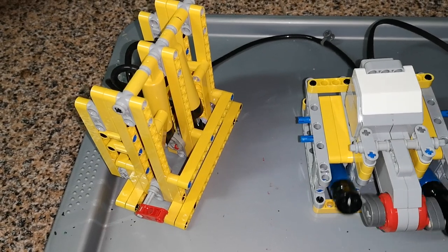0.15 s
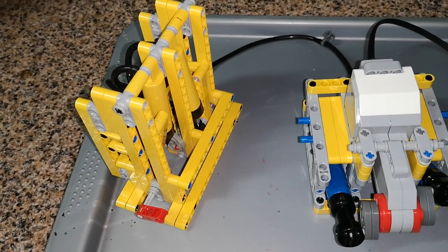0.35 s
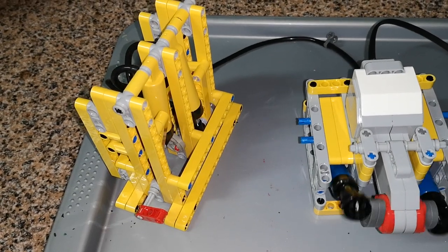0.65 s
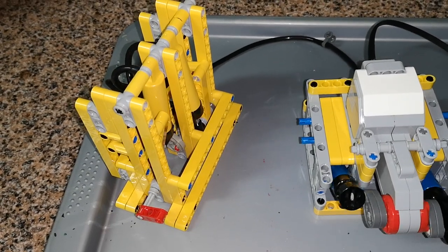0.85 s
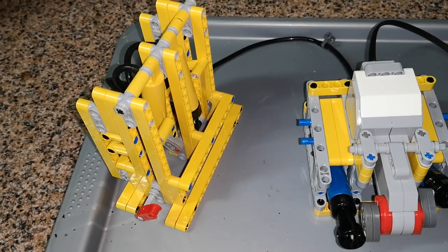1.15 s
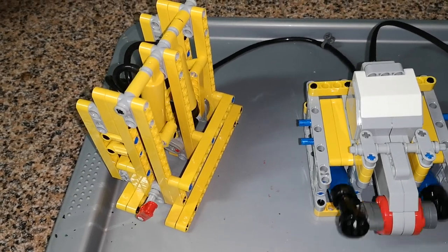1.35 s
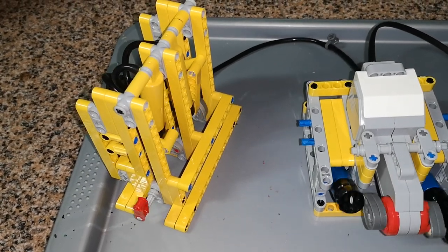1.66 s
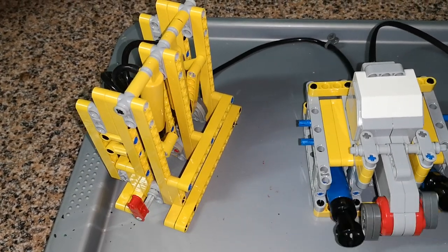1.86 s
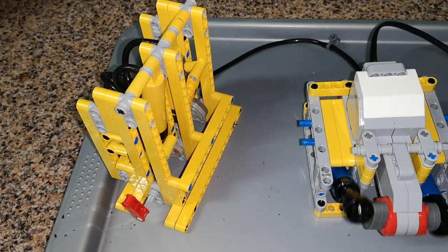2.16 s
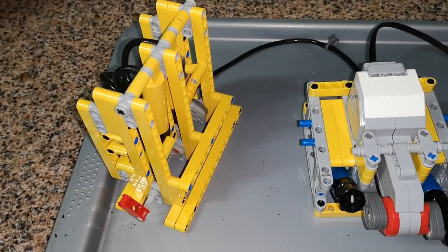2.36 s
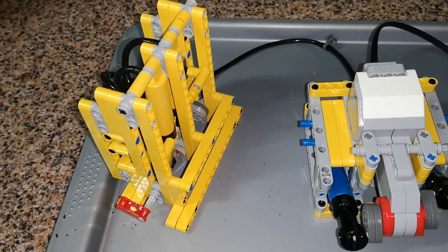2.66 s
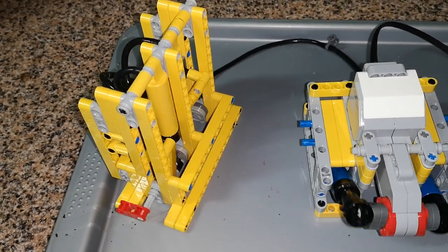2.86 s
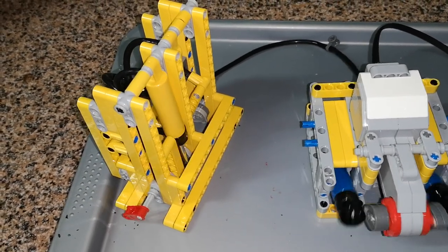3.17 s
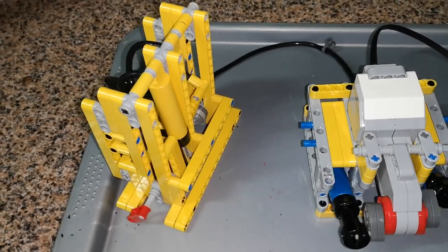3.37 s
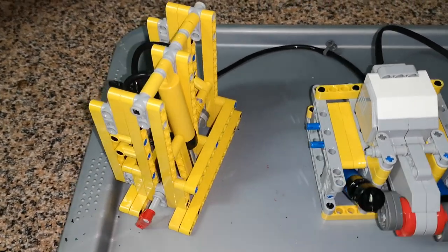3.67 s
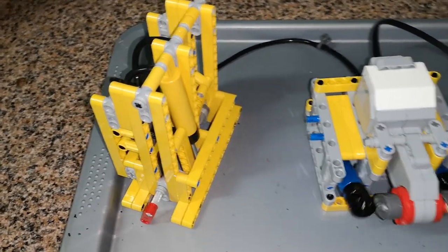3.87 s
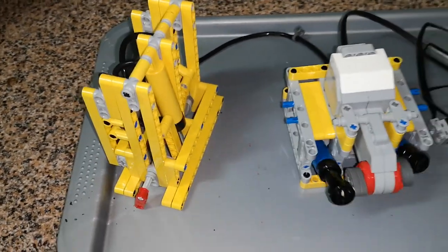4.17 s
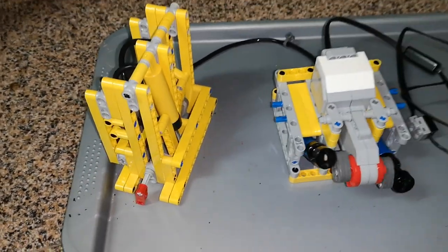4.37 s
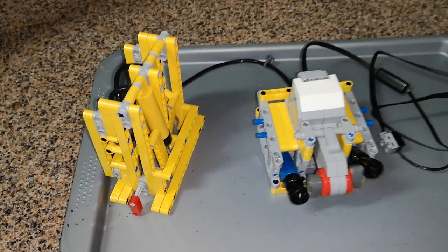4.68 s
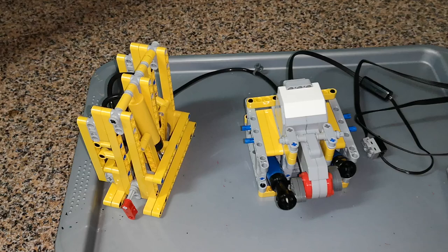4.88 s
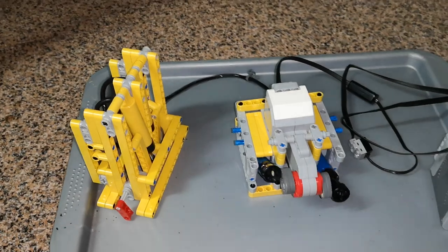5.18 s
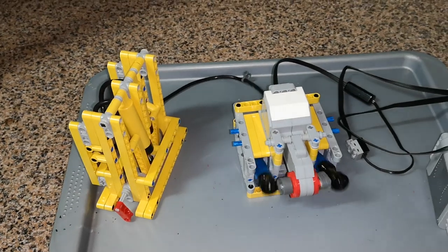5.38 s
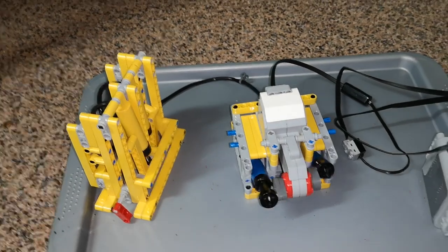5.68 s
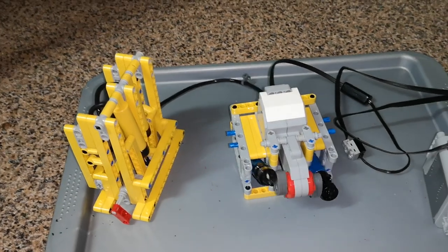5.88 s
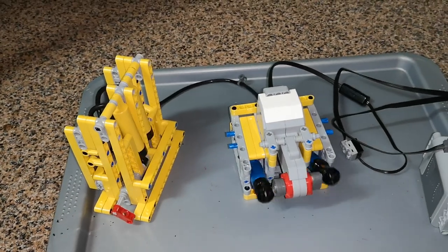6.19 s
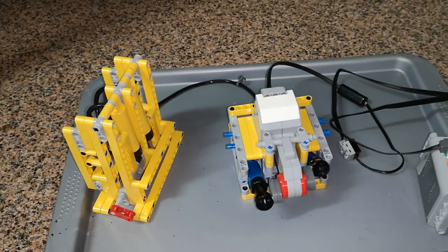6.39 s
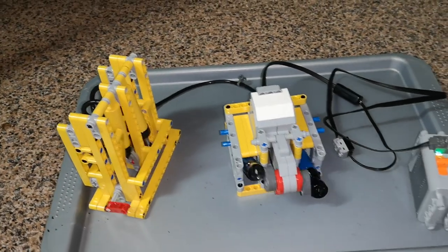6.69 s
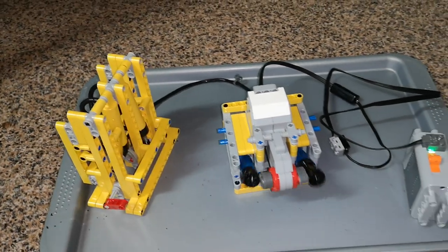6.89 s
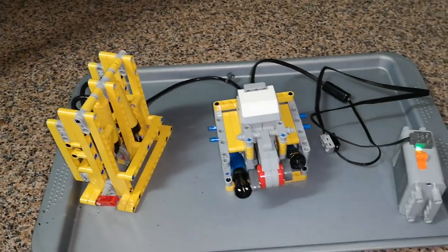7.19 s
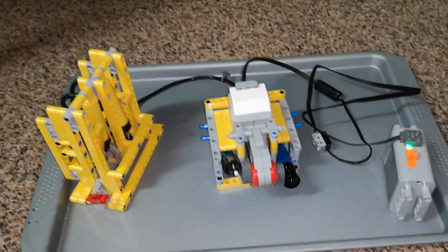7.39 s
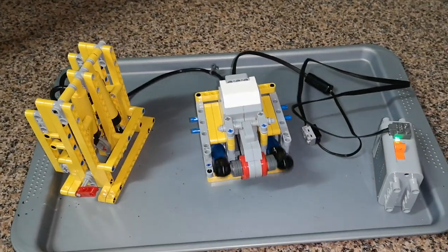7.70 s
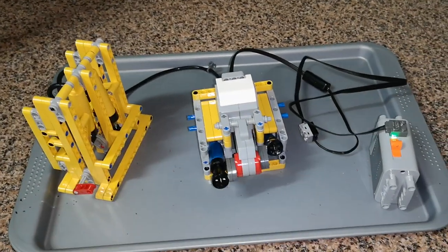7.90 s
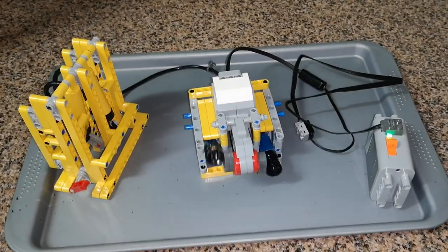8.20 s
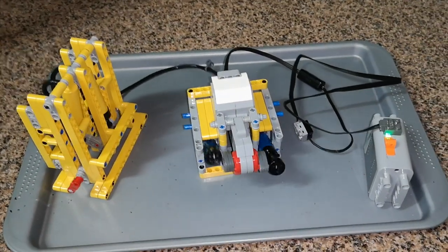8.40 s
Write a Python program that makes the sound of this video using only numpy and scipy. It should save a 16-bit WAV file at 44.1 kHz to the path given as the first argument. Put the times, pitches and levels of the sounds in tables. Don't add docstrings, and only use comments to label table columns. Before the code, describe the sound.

A little motor cranks two toy air pumps without pause, its buzzy whine swooping down and back up about every 0.38 seconds. Each upswing brings a clack, a tick and a chatter of loose gears, with the tray humming and shuddering low. Faint steady hiss of leaking air, uneven hand rumble, a short room tail. The hand-held phone swings round midway, with one dull thump, and the pumps end a little further off.

```python
import sys
import numpy as np
from scipy import signal
from scipy.fft import rfft, irfft, next_fast_len
from scipy.io import wavfile
from scipy.ndimage import uniform_filter1d

SR = 44100
rng = np.random.default_rng(int(sys.argv[2]) if len(sys.argv) > 2 else 0)


def invert_db(level):
    return 10 ** (np.asarray(level, dtype=float) / 20)


def file_out(sig):
    cols = np.atleast_2d(sig).T
    lim = np.clip(cols, -1, 1)
    pcm = np.round(lim * 32767).astype(np.int16)
    wavfile.write(sys.argv[1], SR, pcm)


N = 376613
SIZE = next_fast_len(N + SR)
HZ = np.arange(SIZE // 2 + 1) * SR / SIZE
TIME = np.arange(N) / SR


def unit(x):
    return x / np.sqrt(np.mean(x ** 2))


def curves(table, at=TIME):
    s, *columns = np.transpose(table)
    return [np.interp(at, s, c) for c in columns]


def on_log_hz(points):
    hz, value = np.transpose(points)
    return np.interp(np.log(HZ + 1), np.log(hz + 1), value)


def filtered(x, response):
    return irfft(rfft(x, SIZE) * response, SIZE)[..., :N]


def band(lo_hz, hi_hz, order=4):
    sos = signal.butter(order, [lo_hz, hi_hz], "band", fs=SR, output="sos")
    return signal.sosfreqz(sos, HZ, fs=SR)[1]


def walk(rate):
    k = int(SR / rate)
    held = np.repeat(rng.standard_normal(N // k + 1), k)
    return unit(uniform_filter1d(uniform_filter1d(held, k), k)[:N])


def decays(s, db, decay_s):
    hits = np.zeros(N)
    hits[(np.asarray(s) * SR).astype(int)] = invert_db(db)
    return signal.lfilter([1], [1, -np.exp(-1 / (decay_s * SR))], hits)


# (f/Hz, level/dB [dB per Hz])
HAND_COLOUR = [(8, -36), (16, 6), (24, -2.5), (30, -6.5), (38, -11), (45, -20), (75, -8.5), (130, -35),
               (200, -20), (360, -32.5), (700, -33), (1200, -69)]
# (t/s, level/dB)
GRIP_LEVEL = [(0.0, -60.5), (0.78, -39.5), (0.9, -51), (2.21, -44), (2.4, -52.5), (3.99, -43.5),
              (4.23, -54.5), (4.71, -43.5), (5.07, -55.5), (5.49, -40), (5.59, -57), (5.76, -41),
              (5.99, -55.5), (7.02, -41), (7.11, -59), (7.25, -46.5), (8.52, -45), (8.54, -51)]
# (t/s, level/dB)
TREMBLE = [
    (0, -72.5),
    (1.9, -76),
    (2.0, -101),
    (2.12, -95),
    (2.2, -76),
    (4.3, -74),
    (8.54, -73),
]


def hand_rumble():
    colour = invert_db(on_log_hz(HAND_COLOUR))
    deep = np.clip((70 - HZ) / 25, 0, 1)
    above = 1 - deep
    mid, side = rng.standard_normal((2, N))
    rumble = filtered(mid, colour * deep)
    difference = filtered(side, colour * np.clip(HZ / 500, 0, 1) * above)
    floor = filtered(mid, colour * above) + np.outer([1, -1], difference)
    low = filtered(floor, np.clip((330 - HZ) / 80, 0, 1) * above)
    tremble_db, = curves(TREMBLE)
    floor = floor + low * (invert_db(tremble_db - np.median(tremble_db)) - 1)
    unrest = invert_db(2.0 * walk(2.657) + 1.9 * walk(10))
    grip_db, = curves(GRIP_LEVEL)
    return (invert_db(grip_db) * rumble + invert_db(-58.5) * floor * unrest) / np.std(rumble)


# (t/s, share 0 pumps to the right - 1 ahead)
SWING = [
    (0, 0.08),
    (3.2, 0.05),
    (4.3, 0.64),
    (5.2, 0.93),
    (8.6, 0.96),
]
AIR_DB, AIR_FADE_DB = -61.5, -2.0


def air_leak():
    hiss = filtered(rng.standard_normal((2, N)), band(7300, 15400, order=2))
    swing, = curves(SWING)
    return invert_db(AIR_DB + AIR_FADE_DB * swing) * unit(hiss)


# (t/s, peak level/dB)
JOLTS = [(0.294, -46.5), (0.588, -56), (0.694, -43), (1.09, -47), (1.24, -47), (1.471, -51), (1.848, -45),
         (2.225, -55), (2.567, -49), (2.932, -52), (3.284, -62), (3.583, -53), (3.788, -61), (3.973, -52),
         (4.35, -60), (4.713, -55), (5.103, -50), (5.484, -47), (5.778, -48), (5.897, -47), (6.267, -47),
         (6.643, -55), (7.01, -46.5), (7.409, -45), (7.793, -49.5), (8.224, -45.5), (8.343, -48)]
JOLT_RISE_S, JOLT_DECAY_S, JOLT_DB = 0.036, 0.027, -1.5
BUMP_SHAKE_DB, BUMP_SHAKE_S = -35.5, 0.071


def tray_shudder():
    mid, side = rng.standard_normal((2, N))
    shudder = filtered(mid + 0.13 * np.outer([1, -1], side), band(83, 185, order=2))
    s, db = np.transpose(JOLTS)
    jolts = decays(s, db + JOLT_DB, JOLT_DECAY_S)
    jolts = jolts + decays(BUMP_CONTACTS[0][0], BUMP_SHAKE_DB, BUMP_SHAKE_S)
    tremble = invert_db(curves(TREMBLE)[0] + 3.9 * walk(6.7))
    shake = uniform_filter1d(jolts, int(JOLT_RISE_S * SR)) + tremble
    return shake * unit(shudder)


# (t/s, level/dB)
BUMP_CONTACTS = [
    (4.066, -12),
    (4.075, -18.5),
    (4.084, -7),
    (4.1, -41),
]
# (f/Hz, level/dB, t60/s)
BUMP_MODES = [(122.3, -21.5, 0.46), (149.7, -7.5, 0.06), (207, -10, 0.071), (233.6, -9.5, 0.11),
              (300, -22, 0.15)]
BUMP_LEAD_RAD = .36


def bump():
    push = np.zeros(N)
    for k, (s, db) in enumerate(BUMP_CONTACTS):
        push[int(s * SR)] = invert_db(db) * (-1) ** k
    soft_push = uniform_filter1d(uniform_filter1d(push, 90), 70)
    t = TIME[:SR]
    ring = sum(invert_db(db) * np.sin(2 * np.pi * hz * t) * 1000. ** (-t / t60) for hz, db, t60 in BUMP_MODES)
    lead = np.exp(.5j * BUMP_LEAD_RAD * np.array([[1], [-1]]))
    return filtered(soft_push, rfft(ring, SIZE) * band(117, 263, order=2) * lead)


# (t/s, peak level/dB, then low thud, clack and tick above the peak, level/dB)
KNOCKS = [(0.295, -50.5, 0, 22.5, 22), (0.698, -50, -6, 20, 18), (1.091, -52.5, 1, 27, 31),
          (1.208, -64.5, 8, 21, 29), (1.462, -56.5, -12, 21.5, 23), (1.847, -52.5, 0, 23, 15),
          (2.198, -55.5, -6, 12, 18), (2.568, -47, -1, 19, 11), (2.915, -64.5, 6, 30, 20),
          (3.269, -51.5, -1, 11, 14), (3.585, -56, 1, 6, 9), (3.919, -50.5, 4.5, -3, 6),
          (3.973, -51, -1, 16.5, 14), (4.348, -59, -3, 20, 23), (4.716, -50, -3, 14, 14),
          (5.097, -55, -4, 18, 19), (5.483, -50, -2, 21, 27), (5.889, -57.5, 2, 17, 38),
          (6.269, -51.5, -1, 24.5, 13), (6.623, -61.5, -1, 23, 35), (7.015, -45.5, -6.5, 18.5, 7),
          (7.403, -52.5, -9, 20.5, 27), (7.795, -51.5, 2.5, 21.5, 32), (8.219, -60, -4, 27, 39)]


def knocks():
    s, peak_db, thud_db, clack_db, tick_db = np.transpose(KNOCKS)
    parts = ((thud_db - 3.0, .045, band(130, 280, order=2)),
             (-4.0, .025, band(450, 970, order=2)),
             (clack_db - 5.0, .014, band(900, 2300, order=2)),
             (tick_db - 6.0, .006, band(2500, 12000, order=1)))
    out = 0
    for db, decay_s, response in parts:
        shape = uniform_filter1d(decays(s, peak_db + db, decay_s), 170)
        out = out + unit(filtered(rng.standard_normal(N), response)) * shape
    return out


# (share of the stroke 0-1, level/dB)
TOOTH_LOAD = [(0, 0.5), (.08, 0.5), (.22, 4.5), (.36, 5), (.52, 4.5), (.7, 4), (.8, 3.5), (1, -4)]
SEATING_DB = [-3, -2, -4, 1.5, -8, -2.5, 0., 4., 2, 1, -1, 3, -1.5, -1, -1.5, 0.5, 1.5, -2, -4, 1, 2.5, 4,
              -5, -2.]
WHIRR_DB, WHIRR_DB_PER_OCT = -29.5, 10.5
HISS_DB, HISS_DB_PER_OCT = -34, 13.
SLACK_WHIRR_DB, SLACK_HISS_DB = -5, -2.5
BOOM_DB, BOOM_DB_PER_OCT = -50.5, 2.5
BOOM_PEAK_DB, BOOM_WIDTH_OCT, BOOM_LAG_S = -48.5, 0.63, 0.01
RATTLE_DB, RATTLE_DECAY_S = -44, 0.057
DRAG_DB, DRAG_AT, DRAG_DECAY = 10.5, 0.267, .25
USUAL_SLOW_HZ, STALL_DB_PER_OCT, STALL_AT, STALL_WIDTH = 330, 2, 0.7, 0.076


def loudness(turn, octaves, slack, slow_hz):
    share = turn % 1
    strength_db = np.interp(turn, np.arange(len(STROKES)), np.transpose(STROKES)[3])
    stall = np.exp(-((share - STALL_AT) / STALL_WIDTH) ** 2)
    strength_db += STALL_DB_PER_OCT * np.log2(slow_hz / USUAL_SLOW_HZ) * stall

    load_db, = curves(TOOTH_LOAD, share)
    whirr_db = WHIRR_DB + WHIRR_DB_PER_OCT * octaves + load_db + SLACK_WHIRR_DB * slack
    hiss_db = HISS_DB + HISS_DB_PER_OCT * octaves + SLACK_HISS_DB * slack
    rattle = uniform_filter1d(decays(np.transpose(KNOCKS)[0], RATTLE_DB, RATTLE_DECAY_S), 300)

    since = share - DRAG_AT
    second_stroke = turn.astype(int) % 2 == 0
    drag = second_stroke * np.clip(since / 0.013, 0, 1) * np.exp(-np.maximum(since, 0) / DRAG_DECAY)
    late_octaves = np.interp(TIME - BOOM_LAG_S, TIME, octaves)
    resonance = np.exp(-(late_octaves / BOOM_WIDTH_OCT) ** 2)
    seating_db = np.array(SEATING_DB)[np.rint(turn).astype(int)]
    boom = invert_db(BOOM_DB + BOOM_DB_PER_OCT * octaves + DRAG_DB * drag)
    boom = boom + invert_db(BOOM_PEAK_DB + seating_db) * resonance
    return invert_db(strength_db) * np.array([boom, invert_db(whirr_db), invert_db(hiss_db) + rattle])


# (t/s of top speed, top tooth rate f/Hz, slowest tooth rate f/Hz, strength level/dB)
STROKES = [(-0.04, 1073, 310, 0.5), (0.348, 1090, 275, 1.5), (0.751, 1071, 280, 0.5), (1.148, 1093, 315, 1),
           (1.522, 1066, 325, .5), (1.898, 1072, 370, 1.5), (2.256, 1049, 380, .2), (2.61, 1069, 370, 0.5),
           (2.983, 1060, 440, -0.5), (3.319, 1056, 435, -0.4), (3.664, 1047, 400, -2),
           (4.019, 1073, 370, -2), (4.387, 1068, 335, 0.2), (4.761, 1083, 315, -0.4),
           (5.147, 1061, 285, -0.1), (5.539, 1088, 250, 0.9), (5.945, 1063, 320, 1),
           (6.313, 1073, 340, 0.9), (6.687, 1056, 345, -0.1), (7.062, 1072, 300, -0.2),
           (7.456, 1052, 285, -1.2), (7.853, 1089, 235, -0.7), (8.275, 1067, 330, -0.6),
           (8.68, 1076, 330, 1)]
# (share of the stroke 0-1, speed 0 slowest - 1 top, whine against whirr level/dB)
STROKE_SHAPE = [
    (0, 1.01, 1),
    (.05, 1.0, 2),
    (.21, .46, -5),
    (.34, .12, -7),
    (.5, -.02, -7),
    (.68, .12, -7),
    (.79, .43, -7),
    (.93, .97, -5),
    (1, 1.01, 1),
]
# (multiple of the tooth rate, level/dB)
WHINE = [(1, 3), (2, 3), (2.35, -8), (3, 1), (3.75, -4), (4, -1), (5, 0), (6, -1), (7, -5), (8, -4),
         (9, -7), (10, -5), (11, -10)]
# (f/Hz, level/dB [dB per Hz])
HOUSING = [(180, -60), (300, -46), (500, -24), (700, -25), (850, -13.5), (1050, -4.5), (1270, -13),
           (1600, -6), (2200, -3.5), (3950, 1), (7880, -15), (9290, -13), (13500, -25.5), (15200, -30.5)]
# (f/Hz, width f/Hz, lift level/dB)
RINGS = [(979, 84, 13), (1045, 260, 1.5), (1524, 64, 6.5), (1876, 350, 5.5), (2520, 106, 6), (3055, 340, 4),
         (3870, 295, 6.5), (4570, 230, 1.5), (5400, 1000, 7), (6340, 150, -3), (7240, 140, 3.5),
         (8830, 330, 2), (10720, 270, 5.5), (13000, 750, -4)]
SLACK_AT, SLACK_WIDTH, SLACK_WHINE_DB = .875, .05, -20
WHIRR_APART = .9


def tooth_whine(phase):
    fade_db = .4 * curves(SWING)[0]
    whine = 0
    for k, db in WHINE:
        level = invert_db(db - fade_db * k + 2.4 * walk(70))
        whine = whine + level * np.cos(k * phase + 2 * np.pi * rng.random())
    return whine * (1 + .2 * np.cos(phase / 12))


def tooth_whirr(phase):
    shared, *own = rng.standard_normal((3, N))
    own = signal.sosfilt(signal.butter(1, 700, "high", fs=SR, output="sos"), own)
    roughness = invert_db(0.89 * walk(22) + 1.0 * walk(40) + 1.32 * walk(300))
    gate = (1 + .5 * np.cos(phase)) * roughness * (1 + 0.024 * np.cos(phase / 24))
    return (shared + WHIRR_APART * own) * gate


def gears():
    s, top_hz, slow_hz, _ = np.transpose(STROKES)
    turn = np.interp(TIME, s, np.arange(len(s)))
    speed, whine_db = curves(STROKE_SHAPE, turn % 1)
    speed = uniform_filter1d(speed, SR // 60)
    slack = np.exp(-((turn % 1 - SLACK_AT) / SLACK_WIDTH) ** 2)
    slow = slow_hz[turn.astype(int)]
    top = np.interp(TIME, s, top_hz)
    tooth_hz = slow + (top - slow) * speed
    phase = 2 * np.pi * np.cumsum(tooth_hz * (1 + .007 * walk(200))) / SR

    whine_share = .58 * invert_db(whine_db + SLACK_WHINE_DB * slack)
    teeth = unit(tooth_whirr(phase)) + whine_share * unit(tooth_whine(phase))
    teeth = teeth / np.sqrt(1 + 2 * whine_share ** 2)

    lift = 1 + sum((invert_db(db) - 1) / (1 + (2 * (HZ - hz) / width) ** 2) for hz, width, db in RINGS)
    spectrum = rfft(teeth, SIZE) * invert_db(on_log_hz(HOUSING)) * lift
    above_boom = np.clip((HZ - 1200) / 200, 0, 1)
    above_body = np.clip((HZ - 4600) / 2800, 0, 1)
    shares = (1 - above_boom, above_boom - above_body, above_body)
    gains = loudness(turn, np.log2(tooth_hz / top), slack, slow)
    return sum(gain * unit(irfft(spectrum * share, SIZE)[:, :N]) for gain, share in zip(gains, shares))


# (f/Hz, left minus right level/dB)
RIGHT_BALANCE = [(60, 0), (110, -4), (200, 1), (380, 7), (700, -2), (1290, 1), (2380, 0), (4390, -7.5),
                 (8100, 4.5), (15000, -3)]
AHEAD_BALANCE = [(60, -3), (110, -10), (200, 6), (380, -3), (700, 0.5), (1290, 2), (2380, 1.5), (4390, -2),
                 (8100, 7), (15000, -6)]
# (f/Hz, phase [rad])
RIGHT_PHASE = [(0, 0), (600, -.4), (1030, -.9), (1640, -.5), (2410, -2.2), (3100, -1.3), (3880, -1.9),
               (5680, -2.4), (7240, -9), (8700, -11.2), (9820, -14.8), (11800, -9.8), (13400, -13.3),
               (15200, -3)]
AHEAD_PHASE = [(0, 0), (950, .4), (1290, 0), (3960, 1.3), (4910, 2.3), (5340, .4), (6200, 2.9), (8440, 3.4),
               (10600, -3.8), (11300, 0), (12100, -3.1), (13400, -10), (15200, -15)]
# (f/Hz, level/dB)
AHEAD_COLOUR = [(800, -3.5), (1500, -0.5), (3000, -1.5), (6000, -1), (9000, 2.5), (11500, 2.5), (13000, -5)]
ROOM_DB, ROOM_T60_S, ROOM_DRIFT_HZ = -5, .1, 1.3


def ports(x):
    sides = np.array([[.5], [-.5]])
    places = []
    for balance, phase, colour_db in ((RIGHT_BALANCE, RIGHT_PHASE, 0),
                                      (AHEAD_BALANCE, AHEAD_PHASE, on_log_hz(AHEAD_COLOUR))):
        lead = np.interp(HZ, *np.transpose(phase))
        level = invert_db(sides * on_log_hz(balance) + colour_db)
        places.append(filtered(x, level * np.exp(1j * (sides + .5) * lead)))
    angle = curves(SWING)[0] * np.pi / 2
    direct = places[0] * np.cos(angle) + places[1] * np.sin(angle)

    tails = rng.standard_normal((2, 2, SR // 2)) * 1000. ** (-TIME[:SR // 2] / ROOM_T60_S)
    tails = rfft(tails / np.sqrt(np.sum(tails ** 2, axis=2, keepdims=True)), SIZE)
    drift = 2 * np.pi * ROOM_DRIFT_HZ * TIME
    echoes = rfft(direct * np.cos(drift), SIZE) * tails[0]
    echoes = echoes + rfft(direct * np.sin(drift), SIZE) * tails[1]
    echoes = echoes * np.clip(HZ / 900, 0, 1)
    return direct + invert_db(ROOM_DB) * irfft(echoes, SIZE)[:, :N]


def scene():
    return hand_rumble() + air_leak() + tray_shudder() + bump() + ports(knocks() + gears())


def top_cut(x):
    return signal.sosfilt(signal.butter(12, 15560, fs=SR, output="sos"), x)


def record(dry):
    return top_cut(dry)


dry = scene()
out = record(dry)
file_out(out)
```